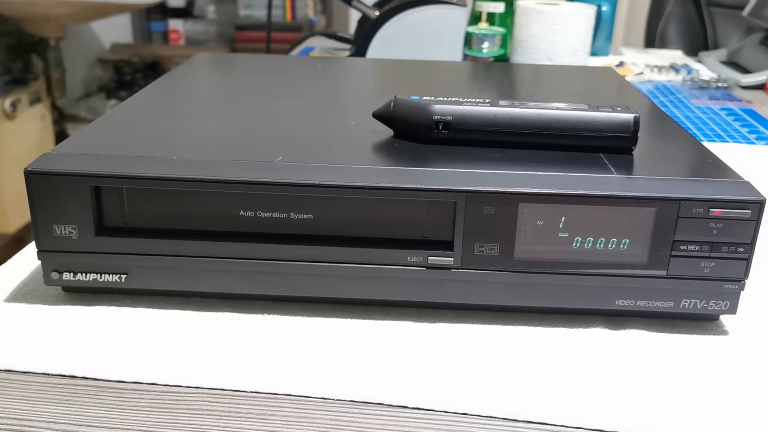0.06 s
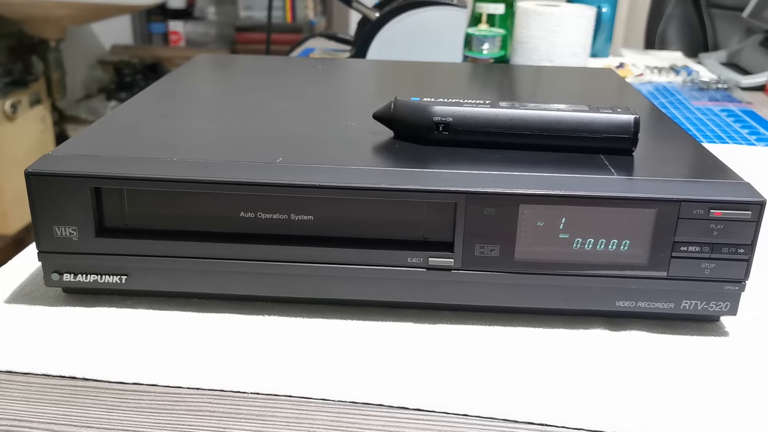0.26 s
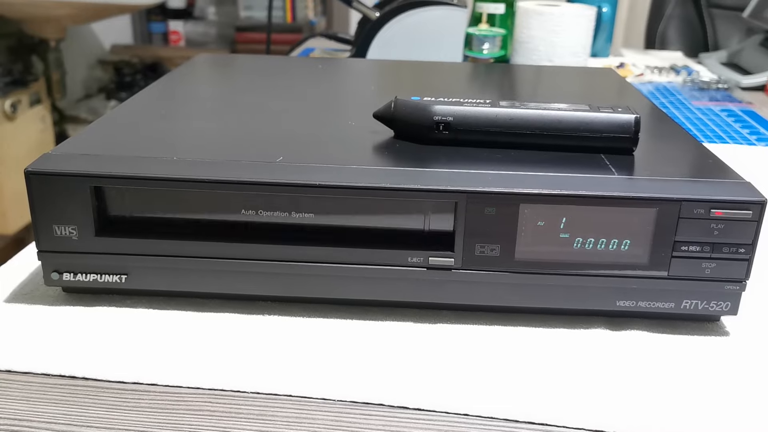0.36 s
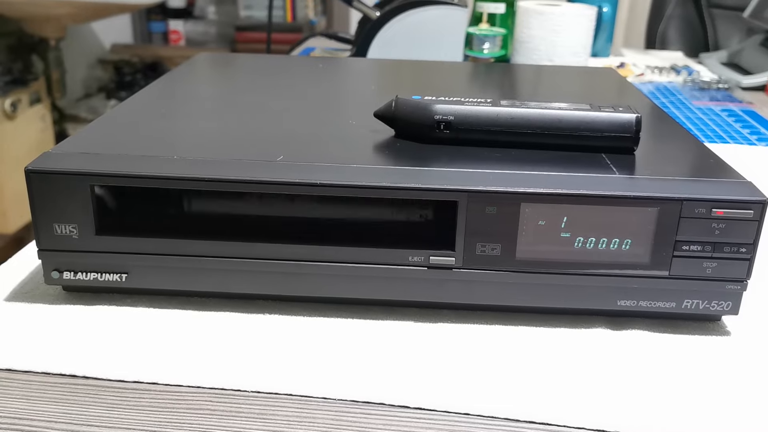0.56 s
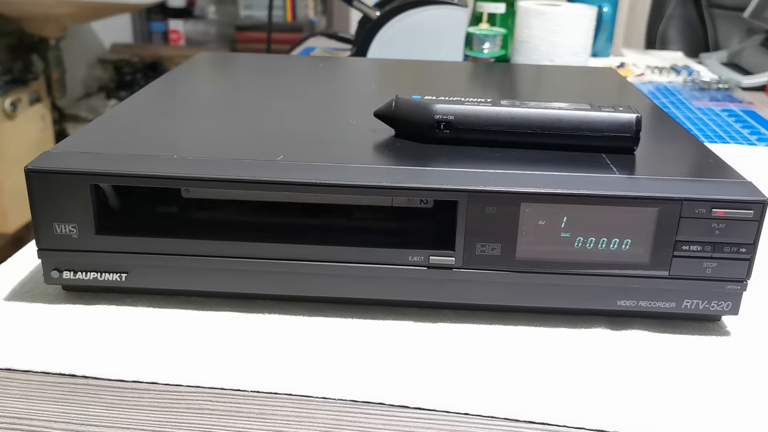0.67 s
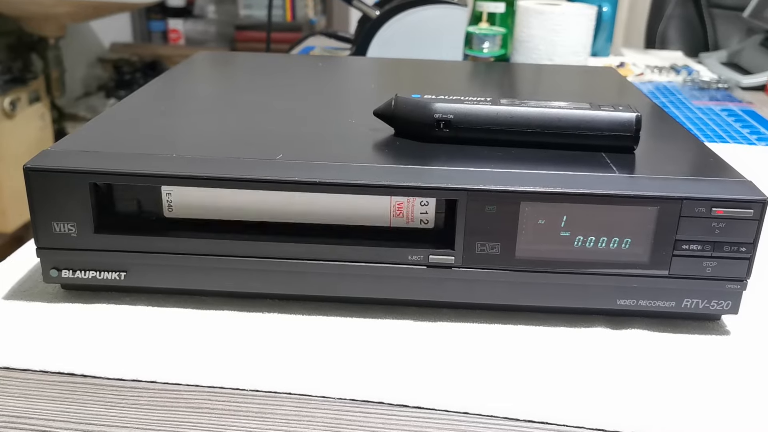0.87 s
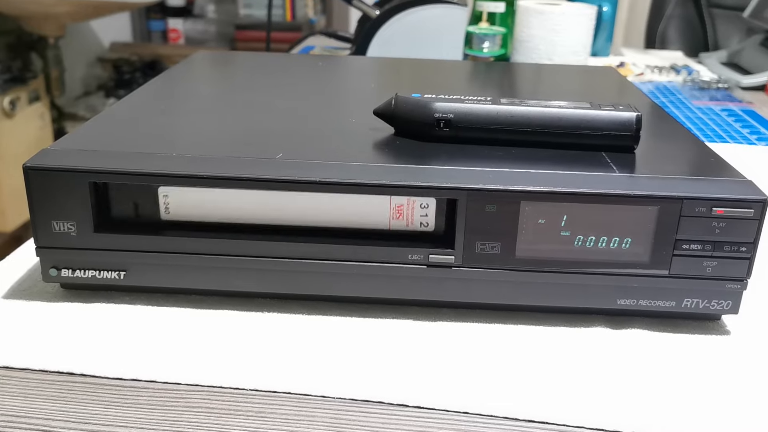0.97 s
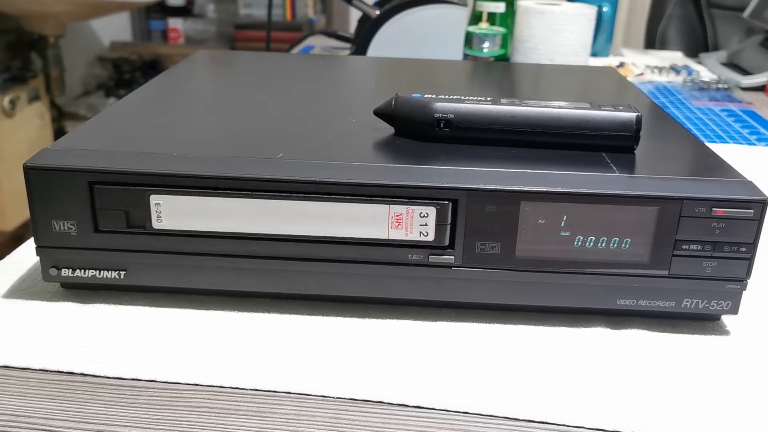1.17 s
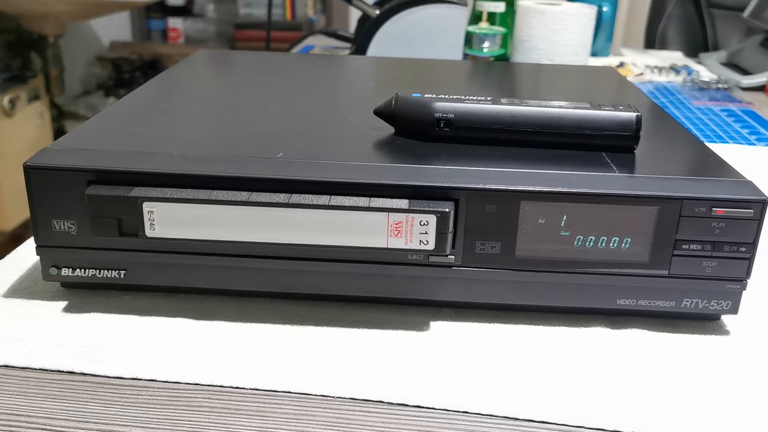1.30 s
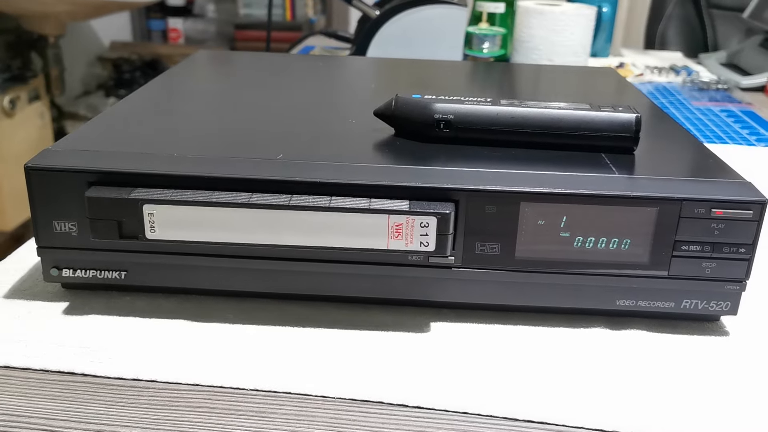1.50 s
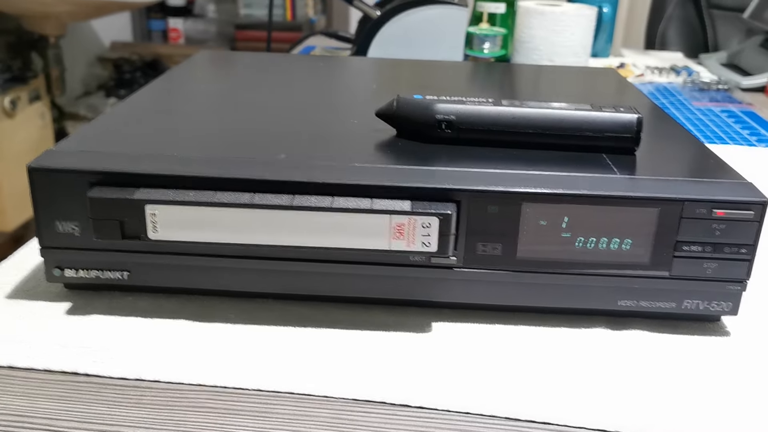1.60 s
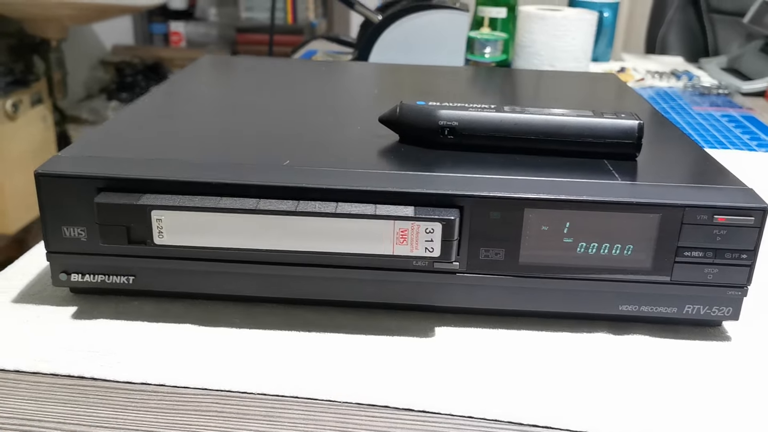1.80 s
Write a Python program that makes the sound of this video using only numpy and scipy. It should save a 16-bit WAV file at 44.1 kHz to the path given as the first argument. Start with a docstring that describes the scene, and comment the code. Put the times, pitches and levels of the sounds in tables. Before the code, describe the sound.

A video cassette recorder ejects a tape with clicks, clunks and a faint motor whir.

```python
"""Video cassette ejecting

A deck on a table in a small, quiet room, heard close on a stereo microphone. A small motor whines
while levers and latches snap, the carriage lifts and rattles forward, and the cassette knocks into
place. Hard contacts ring briefly in the mechanism, soft ones set the hollow case booming.
A low hum and the room's air lie underneath."""
import sys
import numpy as np
from scipy import signal
from scipy.fft import rfft, irfft
from scipy.io import wavfile
from scipy.ndimage import uniform_filter1d

SR = 44100
rng = np.random.default_rng(int(sys.argv[2]) if len(sys.argv) > 2 else 0)


def dump_mix(stems):
    """Bounce the given channels to the path in sys.argv[1] as a 16-bit WAV at rate SR."""
    frames = np.atleast_2d(stems).T  # one column per channel
    limited = np.clip(frames, -1, 1)  # hard clip at full scale
    pcm = np.round(limited * 32767).astype(np.int16)
    wavfile.write(sys.argv[1], SR, pcm)


N = 81585
T = np.arange(N) / SR
HZ = np.maximum(np.fft.rfftfreq(2 * N, 1 / SR), 1)


def clicks(size=4096):
    """Hard contacts ring the mechanism and scatter inside the deck; gives direct sound and room feed."""
    # levers, flap and cassette: t/s, level/dB in each of five bands, the part's own ring f/Hz,
    # ring boost/dB, scatter t60/s, room feed/dB, pan L-R/dB
    contacts = [(0.1633, -23, -26.5, -41, -37, -56, 2590, 14, 0.029, 3.5, -2.5),
                (0.2012, -10.5, -15.5, -14, -26, -38, 1018, 9.9, 0.019, -1.5, 2.5),
                (0.2054, -9.5, -8, 1, -4, -22.5, 6380, 5.6, 0.016, 2, -2.5),
                (0.3795, -23, -25, -17.5, -26, -28, 5940, 23, 0.0081, -10, -3),
                (0.3898, -7.5, -19.5, -20, -29, -40, 1053, 4.1, 0.062, 6, -2.5),
                (0.5462, -25, -51, -42, -44, -54, 5300, 2, 0.013, 0, 3),
                (0.5616, -20.5, -39, -31.5, -43, -47, 4700, 7, .02, 8, -3.5),
                (0.5934, -32, -20, -20, -25.5, -34, 7000, 7, 0.012, -1, 0),
                (0.604, -13, -23.5, -13, -29, -43, 5260, 13, 0.015, 0, -1),
                (0.6246, -6.5, -27.5, -14.5, -34, -43, 5100, 7.3, 0.042, 0.5, -0.5),
                (0.656, -8, -0.5, 0.5, 2, -10, 5360, 4.5, 0.02, 1, -1.5),
                (0.7120, -19, -15.5, -19.5, -34, -36, 5160, 7.9, 0.016, 6.5, 0),
                (0.7410, -11.5, -28, -20.5, -36, -39, 5220, 12, 0.017, 4, -2.5),
                (0.799, -13.5, -20.5, -23, -34, -51, 2170, 2.7, .03, 6, -2.5),
                (0.8999, -6.5, -22.5, -12.5, -27, -46, 4330, 7.8, 0.023, -1, -3),
                (1.0023, -46, -53, -34.5, -52, -52, 5300, 4.7, 0.043, 12.5, -6),
                (1.0999, -7, -13, -12, -17, -32, 4580, 12.3, 0.014, 1, -1.5),
                (1.101, -7, -21, -14, -26, -35, 5970, 12, 0.012, -6.5, -2.5),
                (1.1043, -10.5, -17, -22, -33, -42, 1520, 17, 0.054, 3, -6),
                (1.1845, -20, -37, -42, -37, -62, 1606, 16, 0.0079, 0.5, -2),
                (1.3420, -53, -33.5, -37, -51, -51, 2380, 6.3, 0.024, 13.5, -4),
                (1.4070, -15.5, -35, -32, -46, -44, 1740, 11, 0.11, 3, -0.5),
                (1.4158, -21, -26.5, -24.5, -39, -49, 3430, 7.2, 0.049, -1.5, -1),
                (1.4275, -24.5, -37, -25, -40.5, -47, 6800, 5.9, 0.046, 3, -6)]
    # the five bands: f/Hz
    bands_hz = (1000, 2800, 6000, 10500, 15000)
    bass_cut_hz, ring_width = 356, .07  # width as a share of the ring's pitch
    direct, feed = np.zeros((2, N)), np.zeros((2, N))
    hz = np.maximum(np.fft.rfftfreq(size, 1 / SR), 1)
    body_db = mechanism_db(hz) - 10 * np.log10(1 + (bass_cut_hz / (hz + 20)) ** 4)
    for s, *bands_db, ring_hz, ring_db, t60, room_db, pan_db in contacts:
        colour_db = at_hz(list(zip(bands_hz, bands_db)), hz)
        snap = causal(body_db + colour_db + ring_db * bump(hz, ring_hz, ring_width * ring_hz))
        scatter = rfft(rng.standard_normal((2, size)) * from_db(-60 * T[:size] / t60))
        power = uniform_filter1d(abs(scatter) ** 2, size=50)
        scatter *= causal(-10 * np.log10(power + 1e-9))  # flattened, so the snap keeps its colour
        add(direct, s, pan(pan_db) * irfft(snap * scatter))
        add(feed, s, pan(pan_db) * from_db(room_db) * irfft(snap))
    return direct, feed


def mechanism_db(hz):
    """The colour that the mechanism lends to clicks and rubbing."""
    # peaks and dips: f/Hz, width/Hz, gain/dB
    resonances = [(960, 40, 7.5), (2165, 160, 3.5), (2552, 92, 5), (3610, 1800, -3), (4500, 150, 0),
                  (5453, 146, 6), (6050, 680, 2), (6930, 310, 4), (7890, 420, -4.5), (8800, 320, 0.5),
                  (10600, 390, 2.5), (13650, 770, 5.5)]
    return sum(db * bump(hz, f, width) for f, width, db in resonances)


def knocks():
    """Soft blows of carriage and cassette, heard directly and through the case."""
    # t/s, level/dB, f/Hz, swell/s, relative drive of the case/dB, pan L-R/dB
    blows = [(0.2060, -44, 330, .003, 4, 0), (0.2130, -46, 494, 0.0016, 0, 3),
             (0.2120, -46.5, 131, 0.0093, -12, 3), (0.2420, -42.5, 267, 0.0025, 2, 3),
             (0.39, -38, 304, 0.0092, -4, 2), (0.393, -35.5, 928, 0.0017, -8, -5),
             (0.3985, -40, 639, 0.0027, 8, -2), (0.407, -49.5, 231, 0.0053, -1, 7),
             (0.5460, -47.5, 377, 0.0019, 4, -3), (0.629, -55.5, 302, 0.0036, -5, -4),
             (0.737, -54.5, 320, 0.0042, 16, 4), (0.7430, -47.5, 654, 0.0048, 7, -5),
             (0.791, -41.5, 228, .007, 0, -1), (0.8965, -35.5, 635, 0.0026, -13, -5.5),
             (0.903, -46.5, 244, 0.0061, -2, -2), (1.1020, -44.5, 797, 0.0036, 2, 0),
             (1.1130, -55, 326.8, 0.014, 8.5, -2), (1.1400, -50, 318.4, .006, -1, 3.5),
             (1.4120, -60, 300, .005, 19.5, 0), (1.4430, -56, 193, 0.0064, 18, 4.5)]
    direct, drive = np.zeros((2, N)), np.zeros((2, N))
    for s, db, hz, swell_s, case_db, pan_db in blows:
        blow = from_db(db) * pan(pan_db) * thud(hz, swell_s)
        add(direct, s, blow)
        add(drive, s, from_db(case_db) * blow)
    return direct + from_db(-8) * hollow_case(drive)


def hollow_case(drive):
    """The case booms as a bank of parallel resonators."""
    # f/Hz, relative gain/dB, t60/s
    modes = [(74, -6, 0.21), (119, -8, 0.15), (125, -15.5, 0.3), (165, 6, .3), (239.5, 7.5, 0.25),
             (243, -14, 0.75), (316.4, 7, 0.22), (369, 6, 0.16), (630, -15, .25), (644.4, -7, .25),
             (788, 2, 0.16), (870, 6, .2), (934, -1, 0.18), (1025, 5, .2)]
    out = 0
    for hz, db, t60 in modes:
        r = from_db(-60 / (t60 * SR))
        poles = [1, -2 * r * np.cos(2 * np.pi * hz / SR), r * r]
        out += from_db(db) * signal.lfilter([1 - r, 0, r - 1], poles, drive + 1e-18)
    return out


def rocking():
    """Deep thumps as the whole deck rocks on the table."""
    # t/s, level/dB, f/Hz
    thumps = [(0.206, -53.5, 75), (0.383, -59.5, 57.7), (0.746, -48, 44.8), (0.783, -49, 57),
              (0.886, -48, 49.4), (1.13, -56, 52), (1.423, -56, 70)]
    out = np.zeros(N)
    for s, db, hz in thumps:
        add(out, s, from_db(db) * thud(hz, swell_s=0.022))
    return out


def rubbing(slips_per_s=1800, spread_db=2):
    """Plastic moves along its guides in dense tiny slips that ring the mechanism."""
    # course of the rubbing: t/s, level/dB
    course = [(0, -108), (0.15, -79), (0.32, -67), (0.37, -63), (0.46, -87), (0.56, -79), (0.63, -61),
              (0.70, -60.5), (0.80, -63.5), (0.87, -69), (0.94, -61.5), (1.0, -116), (1.08, -91),
              (1.325, -78), (1.35, -76.5), (1.43, -75), (1.50, -93)]
    # its spectrum: f/Hz, relative level/dB
    colour = [(300, -6), (1000, 2), (1700, -1), (2400, 7.5), (3500, 4), (5200, 1.5), (7000, 2),
              (8500, -12.5), (15000, -12)]
    slipping = rng.random(N) < slips_per_s / SR
    strength = from_db(spread_db * np.minimum(rng.exponential(1, N), 4))
    slips = slipping * strength * rng.standard_normal((2, N))
    rung = irfft(rfft(slips, 2 * N) * causal(mechanism_db(HZ)))[:, :N]
    return level(course) * (T < course[-1][0]) * tint(rung, colour) * pan(db=-8.5)


def drive_train(stop_s=1.487, release_s=0.15):
    """The motor whines until the cassette is out; gears and carriage rumble with the effort."""
    # the loading motor's tones: f/Hz, level/dB
    tones = [(178, -78.5), (357, -72), (895, -77)]
    # effort of the carriage: t/s, level/dB
    effort = [(0, -75), (0.19, -80.5), (0.23, -48.5), (0.34, -62.5), (0.44, -54), (0.52, -59), (0.62, -53),
              (0.80, -50), (0.95, -49), (1.06, -63), (1.16, -52), (1.22, -69.5), (1.39, -64.5),
              (1.46, -62.5), (1.58, -74), (1.85, -76.5)]
    # its rumble: f/Hz, relative level/dB
    colour = [(30, -5), (55, -5.5), (90, -2), (150, 1), (240, 0.5), (340, 8.5), (430, -16), (640, -1),
              (1000, -12), (1600, -30.5), (4000, -50)]
    running = np.clip(1 - (T - stop_s) / release_s, 0, 1)
    whine = running * sum(from_db(db) * tone(hz, waver=0.005) for hz, db in tones)
    return whine + level(effort) * tint(stereo_noise(), colour)


def room_response(build_up_s=0.0066):
    """The small room's diffuse tail builds quickly and dies band by band."""
    # decay times: f/Hz, t60/s
    t60s = [(150, 0.43), (500, 0.14), (1500, 0.26), (6000, 0.31), (10000, 0.3), (15000, 0.22)]
    # the tail's spectrum: f/Hz, level/dB
    colour = [(150, 3), (1000, -2.5), (2800, -4.5), (6000, -9), (10500, -7), (15000, -13.5)]
    noise, out = rfft(stereo_noise(), 2 * N), 0
    onset = 1 - np.exp(-(T / build_up_s) ** 2)
    edges = np.geomspace(40, 20000, 19)
    for low, high in zip(edges, edges[1:]):
        hz = np.sqrt(low * high)
        decay = onset * from_db(-60 * T / at_hz(t60s, hz))
        band = irfft(noise * ((HZ >= low) & (HZ < high)))[:, :N]
        out += band * decay / np.sqrt(np.sum(decay ** 2)) * from_db(at_hz(colour, hz))
    return out


def room_tone():
    """Faint steady air and a low hum."""
    # the air's spectrum: f/Hz, relative level/dB
    colour = [(25, 1.5), (50, -9.5), (85, -13.5), (122, 1.5), (155, -15), (240, -10.5), (420, -23),
              (900, -20), (1600, -26), (4000, -31.5), (8000, -37), (16000, -36.5)]
    air = from_db(-61.5) * tint(stereo_noise(), colour)
    return air + from_db(-73.5) * tone(hz=119, waver=0.0087)


def stereo_noise():
    """White noise, alike in both channels in the bass and unrelated in the treble."""
    # f/Hz, left-right correlation
    likeness = [(100, 0.89), (300, 0.9), (700, 0.44), (1300, 0), (3000, 0.031), (15000, 0.078)]
    mid, side = rfft(rng.standard_normal((2, 2 * N)))
    alike = np.clip(at_hz(likeness, HZ), -.99, .99)
    return irfft(np.sqrt((1 + alike) / 2) * mid + np.sqrt((1 - alike) / 2) * side * [[1], [-1]])[:, :N]


def thud(hz, swell_s):
    """A heavily damped swing whose envelope swells to 1 and dies."""
    age = T / swell_s
    return age * np.exp(1 - age) * np.sin(2 * np.pi * hz * T)


def tone(hz, waver):
    """A sine of rms 1 whose pitch wanders by the share `waver`."""
    slow = rms_one(uniform_filter1d(uniform_filter1d(rng.standard_normal(N), size=2000), size=2000))
    return np.sqrt(2) * np.sin(2 * np.pi * np.cumsum(hz * (1 + waver * slow)) / SR)


def bump(hz, centre_hz, width_hz):
    """A resonance's outline, 1 on top."""
    return 1 / (1 + (2 * (hz - centre_hz) / width_hz) ** 2)


def causal(db):
    """Minimum-phase response with the given magnitude."""
    cepstrum = irfft(db * np.log(10) / 20)
    half = cepstrum.shape[-1] // 2
    cepstrum[..., 1:half] *= 2
    cepstrum[..., half + 1:] = 0
    return np.exp(rfft(cepstrum))


def tint(x, colour):
    """Give a steady sound a spectrum; rms 1."""
    return rms_one(irfft(rfft(x, 2 * N) * from_db(at_hz(colour, HZ)))[..., :N])


def at_hz(points, hz):
    """Read a table along log frequency."""
    f, values = np.transpose(points)
    return np.interp(np.log(hz), np.log(f), values)


def level(curve):
    """Gain over time from rows of t/s, level/dB."""
    return from_db(np.interp(T, *np.transpose(curve)))


def pan(db):
    """Channel gains, left `db` above right."""
    return from_db(np.array([[db], [-db]]) / 2)


def from_db(db):
    """Decibels to gain."""
    return 10 ** (np.asarray(db) / 20)


def rms_one(x):
    """Scale to unit rms."""
    return x / np.sqrt(np.mean(x ** 2) + 1e-20)


def add(out, s, x):
    """Mix a sound in at `s` seconds."""
    i = int(s * SR)
    out[..., i:i + x.shape[-1]] += x[..., :N - i]


def scene():
    """The deck up close, the room's answer behind it, room tone underneath."""
    floor, response = room_tone(), room_response()
    rub, drive = rubbing(), drive_train()
    snaps, snap_feed = clicks()
    blows = knocks()
    deck = snaps + blows + rocking() * pan(db=3) + rub + drive * pan(db=-1)
    feed = snap_feed + from_db(-7) * blows + from_db(7.5) * rub
    room = signal.fftconvolve(feed, response, axes=1)[:, :N]
    return deck + room + floor


def record(dry):
    """The microphone sheds the deepest bass; the top is cut steeply."""
    low_cut_hz, high_cut_hz = 33, 16100
    dry = signal.sosfilt(signal.butter(2, low_cut_hz, "high", fs=SR, output="sos"), dry)
    return signal.sosfilt(signal.ellip(10, .2, 80, high_cut_hz, fs=SR, output="sos"), dry)


dry = scene()
out = record(dry)
dump_mix(out)
```